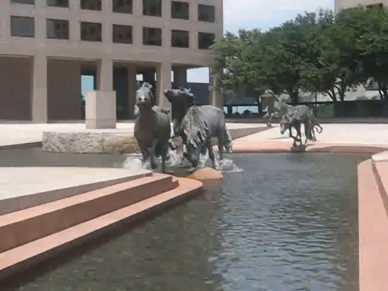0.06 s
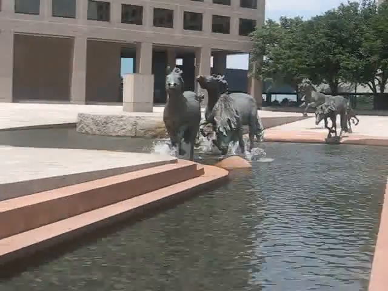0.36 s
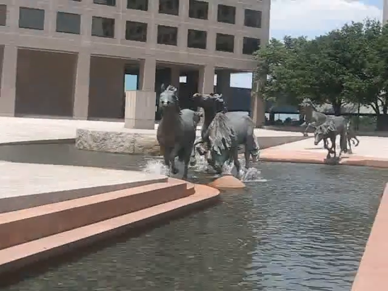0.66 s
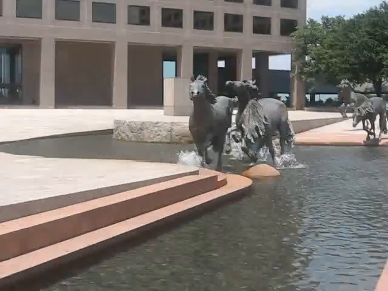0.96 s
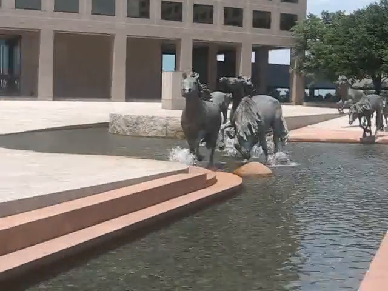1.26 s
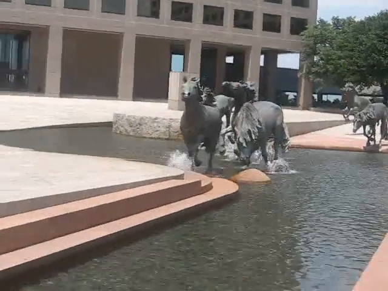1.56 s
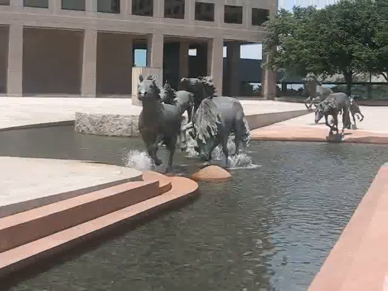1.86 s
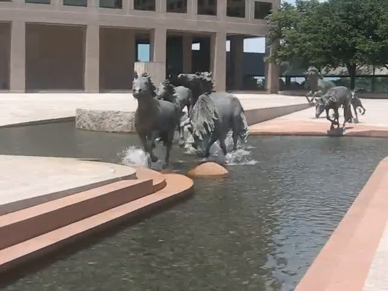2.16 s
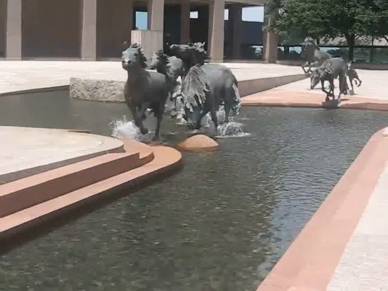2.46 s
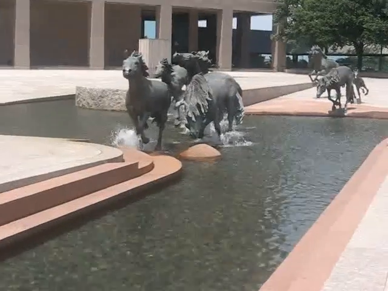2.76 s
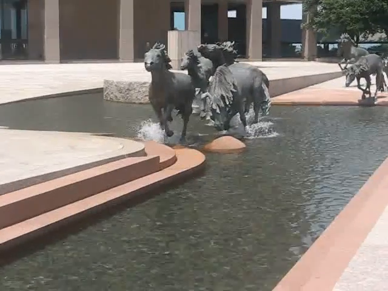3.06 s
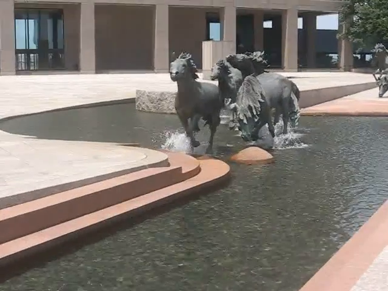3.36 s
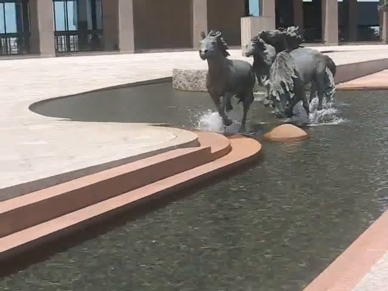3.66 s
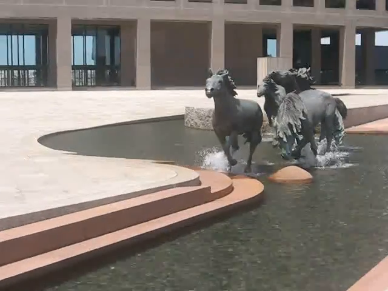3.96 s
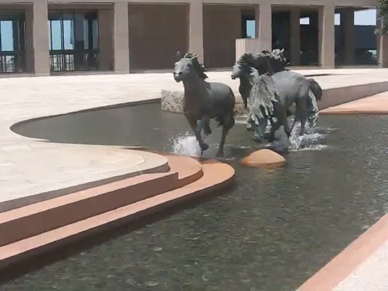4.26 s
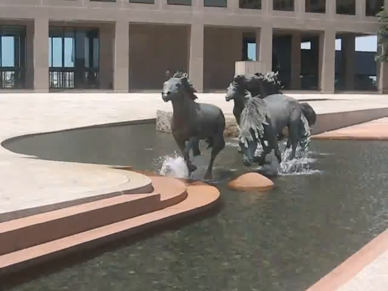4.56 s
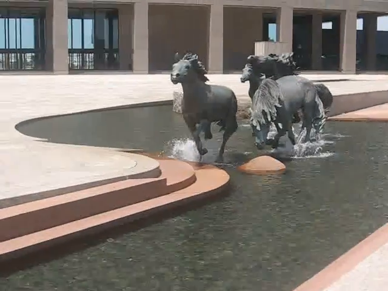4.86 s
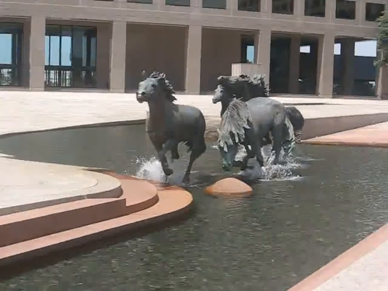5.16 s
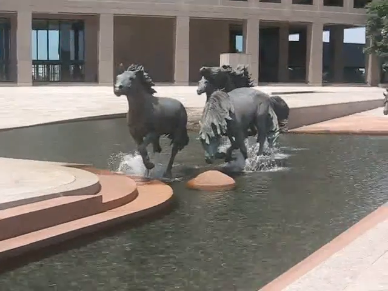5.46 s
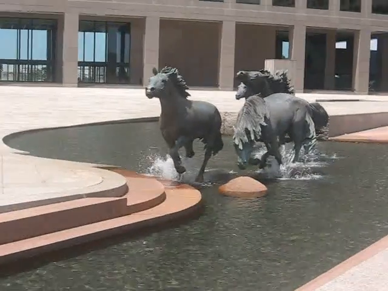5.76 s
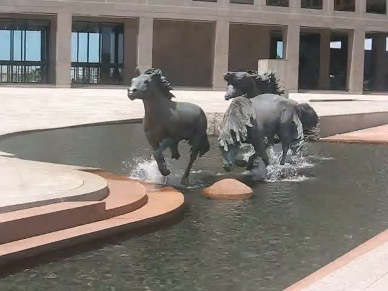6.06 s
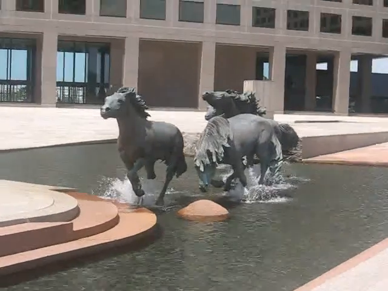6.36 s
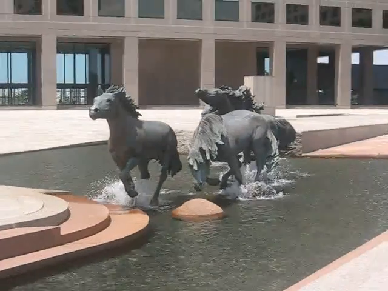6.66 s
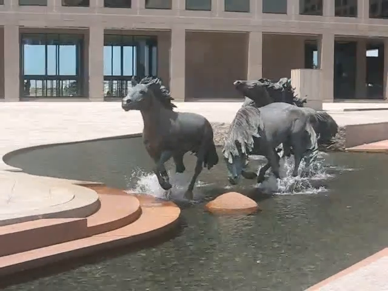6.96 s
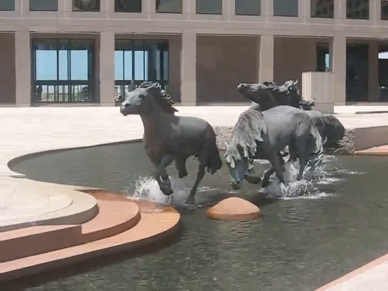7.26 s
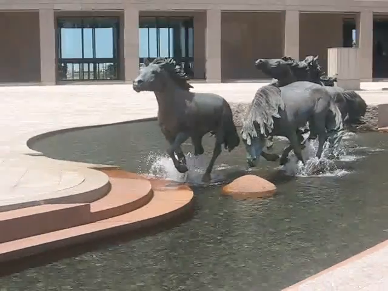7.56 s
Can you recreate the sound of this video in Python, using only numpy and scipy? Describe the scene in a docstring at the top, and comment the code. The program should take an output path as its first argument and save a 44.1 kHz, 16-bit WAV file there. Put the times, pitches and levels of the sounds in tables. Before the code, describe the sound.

Water rushes and splatters without a break from an outdoor fountain, with tiny bubbles and a few soft plops in it. Three sharp finger knocks on the hand-held microphone stand out early, each ducking the water for a moment, and lighter taps follow later. As the microphone turns, the splashing grows slightly softer and brighter. A barely audible engine-like hum comes and goes far away.

```python
"""Fountain on a stone plaza

Jets splash round the hooves of bronze horses in a shallow pool. The rush is churned water, spray drops
and short bubbles; it brightens as the hand-held camera turns. Faint low drones drift in from far away.
Fingers knock the camera a few times, and its automatic volume control ducks the water at loud knocks."""
import sys
import numpy as np
from scipy import signal
from scipy.fft import rfft, irfft
from scipy.io import wavfile
from scipy.ndimage import uniform_filter1d, minimum_filter1d

SR = 44100
rng = np.random.default_rng(int(sys.argv[2]) if len(sys.argv) > 2 else 0)


def file_out(sig):
    """Save sig as 16-bit WAV at sys.argv[1]."""
    # one column per channel
    cols = np.atleast_2d(sig).T
    # limit, then scale
    lim = np.clip(cols, -1, 1)
    pcm = np.round(lim * 32767).astype(np.int16)
    wavfile.write(sys.argv[1], SR, pcm)


N = 333396

# The camera's slow turn. Columns: time_s, place (0 start, 1 middle, 2 end)
CAMERA_TURN = [(0, 0), (2.1, 0.63), (2.7, 1.12), (3.9, 1.22), (4.5, 1.48), (6.0, 1.97)]


def fountain(start_db=-22, turn_db_per_place=-2.0, surge_db=0.2):
    """The jets surge slightly; rush, spray and bubbles swell together and fade as the camera turns."""
    splash = churn(patchy_db=0.89) + gain_of(-3) * spray(per_s=1700, spread_db=3)
    tinkle = gain_of(-19) * bubbles(1100, 5000, per_s=350, spread_db=2, cycles=33)
    plops = gain_of(-11) * bubbles(560, 902, per_s=190, spread_db=3, cycles=10)
    place = follow(CAMERA_TURN, np.arange(N) / SR)
    level_db = start_db + turn_db_per_place * place + surge_db * wander(per_s=24)
    return gain_of(level_db) * unit_level(across_plaza(splash + tinkle) + plops)


def churn(patchy_db):
    """Countless far splashes merge into noise with drifting louder and softer patches."""
    spectrum = signal.stft(rng.standard_normal(N), nperseg=512)[2]
    patches = uniform_filter1d(rng.standard_normal(spectrum.shape), size=9, axis=0)  # blur over pitch
    patches = unit_level(uniform_filter1d(patches, size=10, axis=1))  # blur over time
    return unit_level(signal.istft(spectrum * gain_of(patchy_db * patches), nperseg=512)[1][:N])


def spray(per_s, spread_db, shapes=16, decay_s=0.00074):
    """Drops slap the surface, each a tiny burst of fizz."""
    t = np.arange(256) / SR
    slaps = [unit_level(rng.standard_normal(len(t)) * np.exp(-t / decay_s)) for _ in range(shapes)]
    showers = (signal.oaconvolve(impacts(per_s / shapes, spread_db), slap)[:N] for slap in slaps)
    return unit_level(sum(showers))


def bubbles(low_hz, high_hz, per_s, spread_db, cycles, sizes=24):
    """Bubbles of many sizes ring at random moments, each size at its own pitch."""
    pitches = np.geomspace(low_hz, high_hz, sizes) * rng.uniform(.97, 1.03, sizes)
    streams = (signal.oaconvolve(impacts(per_s / sizes, spread_db), bubble(hz, cycles))[:N]
               for hz in pitches)
    return unit_level(sum(streams))


def bubble(hz, cycles, rise=0.13):
    """An air pocket rings for a few cycles, rising in pitch as it nears the surface."""
    t = np.arange(int(SR * cycles / hz) + 2) / SR
    age = t * hz / cycles  # runs from 0 to 1
    tone = np.sin(2 * np.pi * hz * t * (1 + rise * age))
    onset = 1 - np.exp(-2 * hz * t)
    ring = tone * onset * gain_of(-60 * age)
    return ring / abs(ring).max()


def across_plaza(water):
    """The water's tone colour blends from one camera place to the next."""
    # The rush's balance of low and high at each place. Columns: pitch_hz, relative_db
    rush_start = [(15, -44), (25, -20), (70, -5.5), (115, -11.5), (180, -4.5), (350, -4), (520, -0.5),
                  (760, -1), (900, -2.5), (1270, -13), (1750, -10.5), (3200, -20.5), (4500, -24.5),
                  (5600, -34), (6100, -38), (6920, -53), (9000, -82)]
    rush_middle = [(15, -37), (25, -16), (81, -3), (200, -4), (340, -1.5), (500, -1.5), (790, 0.3),
                   (1200, -9.5), (1650, -10), (2030, -14.5), (2300, -13.5), (3300, -18.5), (4500, -20.5),
                   (5500, -30.5), (6200, -35.5), (6920, -49.5), (9000, -80.5)]
    rush_end = [(15, -39), (25, -14), (85, -3), (140, -2.5), (300, -3.5), (520, -4.5), (813, -1),
                (1030, -10), (1940, -12), (2460, -10), (2970, -12.5), (4300, -16.5), (5050, -20),
                (5500, -26), (6100, -30), (6920, -45.5), (9000, -86)]
    # Dips and humps from a nearby reflection at the last place. Columns: pitch_hz, width_hz, change_db
    reflection = [(870, 110, 2.5), (1100, 130, -1.5), (1910, 110, 0.5), (2134, 120, -5), (2470, 170, 1),
                  (2960, 250, -2.5)]
    hz, t, spectrum = signal.stft(water, SR, nperseg=2048, noverlap=1536)
    place = follow(CAMERA_TURN, t)
    ripple_db = sum(db * np.exp(-((hz - centre) / width) ** 2) for centre, width, db in reflection)
    colours_db = [level_at(rush_start, hz), level_at(rush_middle, hz), level_at(rush_end, hz) + ripple_db]
    shares = [np.maximum(1 - abs(place - k), 0) for k in range(3)]
    colour = gain_of(sum(np.outer(db, share) for db, share in zip(colours_db, shares)))
    colour /= np.sqrt((colour ** 2).sum(0))  # same power at every place
    return unit_level(signal.istft(spectrum * colour, SR, nperseg=2048, noverlap=1536)[1][:N])


def big_splashes():
    """Large air pockets gulp, and one heavy drop slaps the pool brightly."""
    # The largest gulps of air. Columns: start_s, peak_db, pitch_hz
    gulps = [(0.268, -17, 622), (1.415, -7, 780), (4.885, -12.5, 634), (5.739, -15, 684), (5.93, -18, 773),
             (6.125, -18, 576), (6.705, -23, 684)]
    # The heavy drop: start_s, peak_db, pitch_hz
    heavy_drop = (6.3635, -14, 3400)
    out = np.zeros(N)
    for start_s, db, hz in gulps:
        add(out, start_s, gain_of(db) * bubble(hz, cycles=14))
    start_s, db, hz = heavy_drop
    add(out, start_s, gain_of(db) * bubble(hz, cycles=7))
    return out


def finger_knocks(contact_s=0.00036, muffle_hz=4200):
    """Each soft finger knock makes the small camera body ring very briefly."""
    # Finger knocks. Columns: start_s, strength_db, stretch (multiplies the onset and ring times)
    knocks = [(.1790, -4, 1.3), (0.7352, -10, 2.7), (0.7402, 7.5, 1.8), (1.4530, 4, 1.4),
              (2.1410, -4.5, 1.2), (2.1630, 6.5, 1.2), (4.0633, -2, 0.8), (5.1720, -10, 3.3),
              (7.445, -7.5, 1.1), (7.4513, -11, 1.2)]
    # The body's natural tones. Columns: pitch_hz, relative_db, ring_s (to fade 60 dB at stretch 1)
    body_tones = [(446, -5, 0.011), (815, 4, .008), (1320, -1, 0.0066), (1810, 1, 0.0062),
                  (2240, -7.5, .006), (3640, -16.5, .003)]
    out, t = np.zeros(N), np.arange(2048) / SR
    for start_s, strength_db, stretch in knocks:
        tones = [gain_of(db - 60 * t / (ring_s * stretch)) * np.sin(2 * np.pi * hz * t)
                 for hz, db, ring_s in body_tones]
        onset = 1 - np.exp(-t / (contact_s * stretch))
        knock = (sum(tones[::2]) - sum(tones[1::2])) * onset  # neighbouring tones swing opposite ways
        add(out, start_s, gain_of(strength_db) * knock / abs(knock).max())
    return signal.sosfilt(signal.butter(2, muffle_hz, fs=SR, output="sos"), out)


def far_drones(pitch_waver=0.031, flutter_db=1.5, fade_s=0.35):
    """Faint wavering drones, likely engines beyond the plaza, fade in, glide and fade out."""
    # Two far drones. Columns: start_s, length_s, first_pitch_hz, glide_hz_per_s, level_db
    drones = [(0.406, 3.0, 72.56, 4, -44.5), (5.003, 2.5, 145.8, -3.5, -43)]
    out = np.zeros(N)
    for start_s, length_s, first_hz, glide, db in drones:
        t = np.arange(N) / SR - start_s
        fade = np.clip(np.minimum(t, length_s - t) / fade_s, 0, 1)
        hz = (first_hz + glide * t) * (1 + pitch_waver * wander(per_s=6.4))
        tone = np.sqrt(2) * np.sin(2 * np.pi * np.cumsum(hz) / SR)
        out += fade * gain_of(db + flutter_db * wander(per_s=4)) * tone
    return out


def volume_control(x, ceiling_db, recover_s, smooth_samples=24):
    """A peak over the ceiling turns the volume down within a millisecond; it then creeps back up."""
    excess = np.maximum(abs(x).max(0) / gain_of(ceiling_db) - 1, 0)
    leak = np.exp(-np.arange(N) / SR / recover_s)
    held_excess = np.maximum.accumulate(excess / leak) * leak
    gain = minimum_filter1d(1 / (1 + held_excess), smooth_samples)
    return x * uniform_filter1d(uniform_filter1d(gain, smooth_samples), smooth_samples // 2)


def impacts(per_s, spread_db):
    """Randomly timed clicks that push or pull: many small, a few large."""
    size = gain_of(spread_db * np.minimum(rng.exponential(1, N), 4))
    return size * rng.choice([-1, 1], N) * (rng.random(N) < per_s / SR)


def wander(per_s):
    """A random drift of typical size 1, with few swings faster than per_s."""
    hz = np.fft.rfftfreq(N, 1 / SR)
    return unit_level(irfft(rfft(rng.standard_normal(N)) * (hz > 1) / (1 + (hz / per_s) ** 2), N))


def gain_of(db):
    """Turns decibels into a multiplier."""
    return 10 ** (np.asarray(db) / 20)


def unit_level(x):
    """Scales a signal to an average level (rms) of 1."""
    return x / np.sqrt(np.mean(x ** 2) + 1e-20)


def level_at(points, hz):
    """Reads a curve of levels at the pitches hz, with octaves evenly spaced."""
    pitches, levels = np.transpose(points)
    return np.interp(np.log(hz + 1), np.log(pitches + 1), levels)


def follow(rows, t):
    """Reads a curve at the times t."""
    return np.interp(t, *np.transpose(rows))


def add(mix, start_s, sound):
    """Mixes a sound in at start_s."""
    part = mix[max(round(start_s * SR), 0):][:len(sound)]
    part += sound[:len(part)]


def scene():
    """Water, far drones and finger knocks reach one microphone."""
    return (fountain() + big_splashes() + far_drones() + finger_knocks())[None]


def record(dry):
    """The camera turns loud peaks down, then cuts the treble above 7100 Hz."""
    ducked = volume_control(dry, ceiling_db=-11, recover_s=0.16)
    treble_cut = signal.firwin(511, 7100, window=("kaiser", 9), fs=SR)
    return signal.oaconvolve(ducked, treble_cut[None], "same")


dry = scene()
out = record(dry)
file_out(out)
```